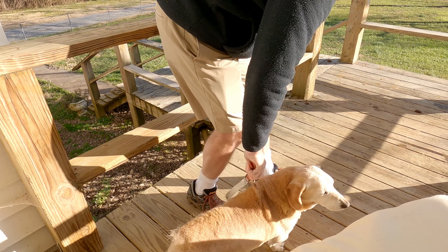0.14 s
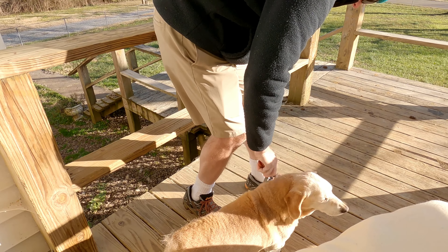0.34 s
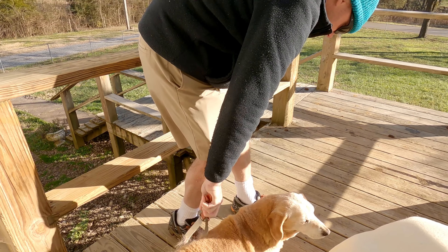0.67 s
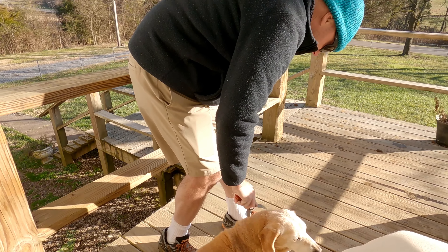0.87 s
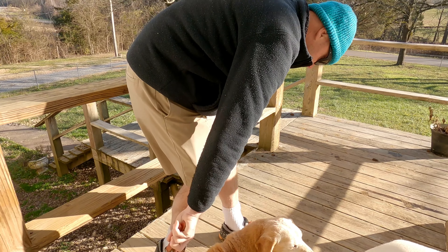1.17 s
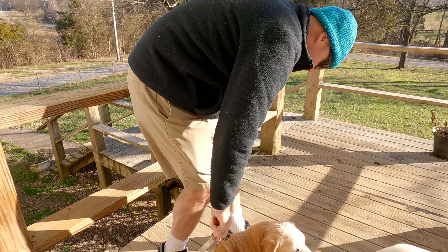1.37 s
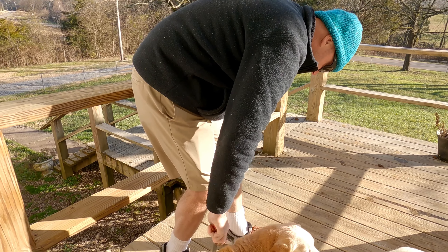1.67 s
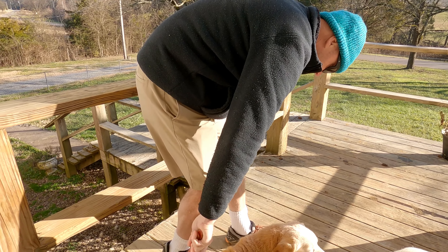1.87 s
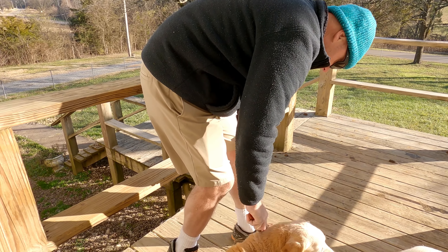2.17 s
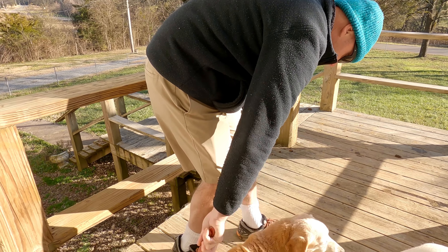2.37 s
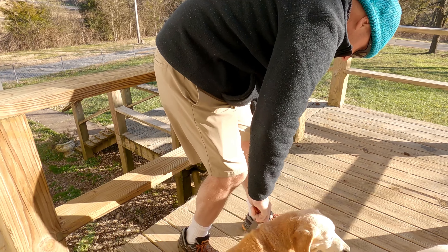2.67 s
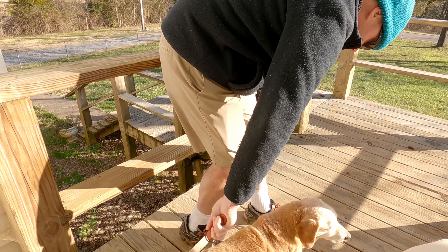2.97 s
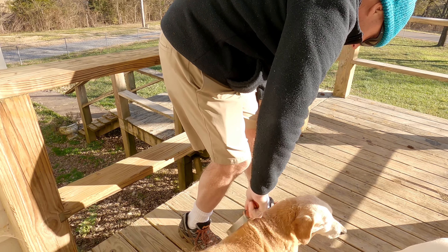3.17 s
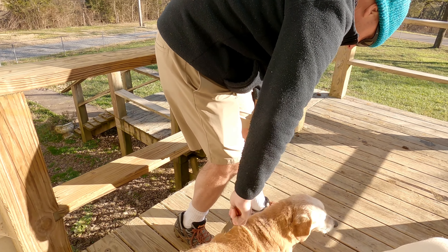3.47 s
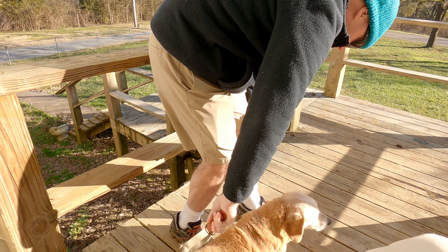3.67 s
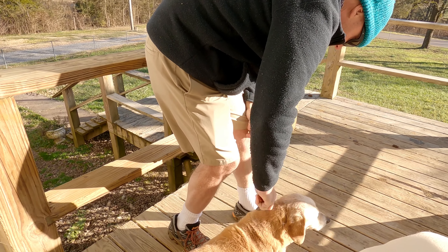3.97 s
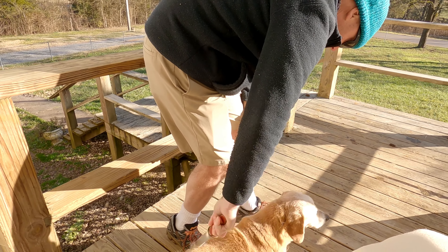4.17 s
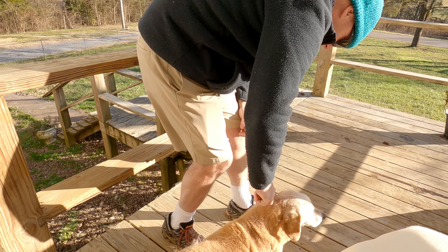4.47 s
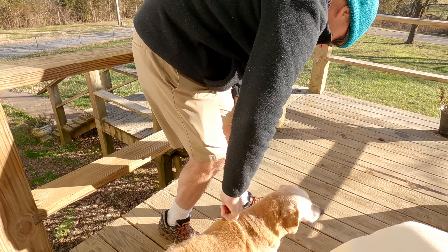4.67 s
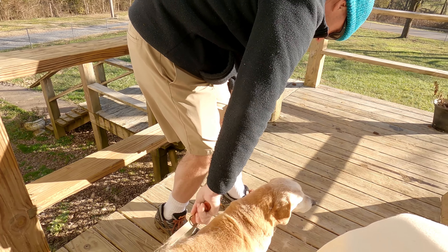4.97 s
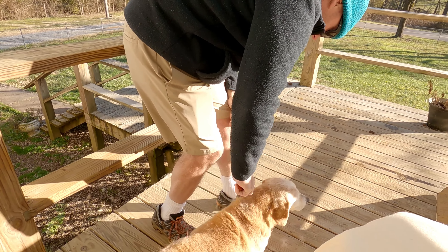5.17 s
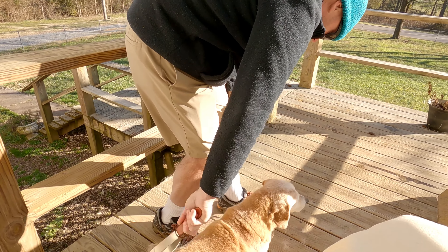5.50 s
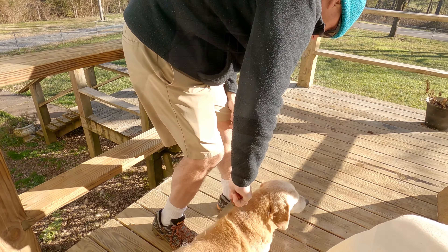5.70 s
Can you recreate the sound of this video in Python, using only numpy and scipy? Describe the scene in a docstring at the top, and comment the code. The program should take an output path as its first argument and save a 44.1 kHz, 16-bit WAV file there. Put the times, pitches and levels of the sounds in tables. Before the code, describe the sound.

Close up, a metal-toothed brush rubs to and fro through a dog's fur, about three strokes a second, with fine scraping and thin high ringing. Odd tangles rasp free. A falling bird whistle comes early, then faint trills and coos. A far motor rises in the first second; an engine drone swells around two seconds. Low rumble and distant traffic lie beneath. Open-air stereo, microphone near the brush.

```python
"""Fine scratching comes first, to and fro: a metal-toothed brush is pulled through a dog's coat outdoors.
Random slips of hair, coloured as rub and scrape, also pluck resonances for the teeth, which ring high
and thin, with single teeth singing out around stroke ends; filtered noise rasps as tangles give way.
Wavering tones make a falling whistle, trills and coos, the drone of a far engine and a motor speeding up.
Coloured noise lies beneath: a low rumble that heaves briefly, far traffic and a faint hiss of air."""
import sys
import numpy as np
from scipy import signal
from scipy.fft import rfft, irfft
from scipy.io import wavfile
from scipy.ndimage import uniform_filter1d

SR = 44100
rng = np.random.default_rng(int(sys.argv[2]) if len(sys.argv) > 2 else 0)


def store_pcm(level_fs):
    """Save levels as 16-bit WAV."""
    pcm = np.round(np.clip(level_fs, -1, 1) * 32767).astype(np.int16)
    wavfile.write(sys.argv[1], SR, np.atleast_2d(pcm).T)


N = 257544
TIME = np.arange(N) / SR
FREQS = np.fft.rfftfreq(N, 1 / SR)

BITE_DB, COAT_BITE_DB = 16.5, 11  # climb over a rise and fall over a lift, for teeth and coat
COAT_LAG_S = 0.0044  # the coat gives way a little after the teeth
TEETH_REST_DB = -79  # pre-mix floor: the teeth never quite leave the fur
# faint rustle between strokes: [t/s, level/dB before the mix]
RUSTLE = [(0, -73.5), (1.8, -86), (2.1, -69.5), (2.5, -66), (2.8, -71.5), (3.1, -72), (3.35, -77),
          (3.7, -79), (4, -68.5), (4.5, -78.5), (5.1, -73.5), (5.6, -76), (5.84, -72)]


def brush():
    """Coat rub, metal scrape and ringing teeth share the uneven drag of the hand."""
    bright_db = brightness()
    catching = gain_of(0.46 * np.clip(wander(24), -1.5, 1.5))
    tooth_strokes = stroking(BITE_DB, ring_share=0.94) * catching
    pull = np.hypot(tooth_strokes, gain_of(TEETH_REST_DB))
    coat_strokes = stroking(COAT_BITE_DB, ring_share=0, lag_s=COAT_LAG_S)
    rub = np.hypot(coat_strokes, gain_of(follow(RUSTLE)[0]))
    drag = gain_of(1.37 * np.clip(wander(45), -1.5, 1.5))

    coat = (coat_hair() + back()) * rub * drag
    hiss = gain_of(-7.5) * scrape(bright_db) * pull * drag
    metal = hiss + gain_of(-8.5) * teeth(pull, bright_db) + pings()
    return gain_of([[4.2], [3.3]]) * coat + gain_of([[1.7], [-1.7]]) * metal + snags()


EDGE_CURVE = 1.28  # exponent that rounds both the bite and the lift
# brush strokes, a light return and a firm pull in turn, levels before the mix:
# [bite t/s, rise/s, hold/s, lift/s, tooth ring level/dB, coat rub level/dB,
#  brightness (scales the treble tilt), swell over the hold/dB]
STROKES = [(0.093, 0.043, 0.12, 0.064, -61.5, -66.5, -0.5, 2),
           (0.457, 0.082, 0.078, 0.079, -60, -64, 1.5, 4), (0.726, 0.041, 0.1, 0.059, -62, -65.5, 3, 0),
           (1.047, 0.089, 0.11, 0.07, -61, -65.5, 1.5, 2), (1.313, .03, .155, 0.083, -64, -67.5, 0, 3.5),
           (1.7, 0.08, 0.085, 0.066, -56.5, -63.5, 0, 4.5),
           (1.948, 0.039, 0.12, 0.064, -65.5, -69, -0.5, 4.5),
           (2.279, 0.084, 0.11, .1, -57.5, -62.5, -1.5, 5.5),
           (2.586, 0.052, .11, 0.096, -60, -64.5, -0.5, -2.5), (2.885, 0.032, .11, .055, -54, -62, 1, 2.5),
           (3.137, .03, 0.14, 0.038, -63, -69.5, 0, 4), (3.457, 0.061, 0.17, 0.032, -57, -64, 0.5, 6),
           (3.806, 0.061, .05, 0.059, -68.5, -70.5, -2, -1), (4.097, 0.095, .095, 0.08, -58.5, -63.5, 0, 4),
           (4.364, .04, 0.064, 0.08, -62.5, -69, -1, -2), (4.664, .09, 0.19, 0.063, -55, -62, -3, 9),
           (5.03, 0.085, 0.11, 0.069, -63.5, -72, -2, 5.5), (5.331, 0.044, 0.15, 0.06, -54.5, -62, -1, 2.5),
           (5.665, .05, .12, 0.049, -62.5, -68, -1, 5.5)]


def stroking(bite_db, ring_share, lag_s=0):
    """Amplitude of all strokes: each bites, swells or eases over its hold, and dies as the brush lifts."""
    power = np.zeros(N)
    for s, rise, hold, lift, ring_db, rub_db, _, swell_db in STROKES:
        near = abs(TIME - s - hold / 2) < .5
        age = TIME[near] - s - lag_s
        before, after = -age / rise, (age - hold) / lift
        off = np.maximum(np.maximum(before, after), 0)  # 0 while the stroke holds
        level_db = ring_share * ring_db + (1 - ring_share) * rub_db
        held_db = swell_db * (np.clip(age / hold, 0, 1) - .5)
        power[near] += gain_of(level_db + held_db - bite_db * off ** EDGE_CURVE) ** 2
    return np.sqrt(power)


PULL_BRIGHTEN, RETURN_BRIGHTEN = 6, -5  # change of brightness over a hold


def brightness():
    """Pulls gather treble as they go; returns land bright and grow duller."""
    ends = []
    for k, (s, _, hold, *_, bright, _) in enumerate(STROKES):
        change = PULL_BRIGHTEN if k % 2 else RETURN_BRIGHTEN
        ends += [(s + u * hold, bright + change * (u - .5)) for u in (0, 1)]
    return follow(ends)[0]


# hair sliding on hair: [f/Hz, relative level/dB per Hz]
COAT = [(300, -2), (600, -2), (1000, -0.5), (1600, 0.5), (2300, 1.5), (3200, 1), (4600, 2), (6500, -0.5),
        (10000, -5), (15500, -21)]


def coat_hair():
    """Hair slipping on hair: dense random impulses given the colour of the coat."""
    return colour(slips(per_s=14000, spread_db=0), COAT)


# modes of the brush's back: [f/Hz, width/Hz, relative level/dB]
BACK = [(2296, 170, -13.5), (3210, 130, -22)]


def back():
    """The dragging coat sets the back of the brush ringing faintly."""
    hairs = slips(per_s=3000, spread_db=1.5)
    return sum(gain_of(db) * evened(resonate(hairs, hz, width)) for hz, width, db in BACK)


# hair sliding on metal: [f/Hz, relative level/dB per Hz]
SCRAPE = [(2000, -21), (5000, -23), (6600, -10), (8000, 5), (9800, -1), (11500, -1), (13500, 3),
          (15500, -7)]


def scrape(bright_db, patchy_db=2.5, brighten=0.38):
    """Hair on metal: a hiss whose colour shifts as different tufts pass the teeth."""
    hiss = rfft(colour(slips(per_s=7000, spread_db=3.0), SCRAPE))
    spacing_hz = 2000
    out = np.zeros((2, N))
    for hz in np.arange(2000, 18000, spacing_hz):
        band = np.maximum(1 - abs(FREQS - hz) / spacing_hz, 0)  # overlapping triangles
        tilt_db = brighten * bright_db * np.clip((hz - 9500) / 1000, -2, 3)
        out += irfft(hiss * band, N) * gain_of(tilt_db + patchy_db * wander(35))
    return out


# modes of a tooth: [f/Hz, relative level/dB]
TEETH = [(6150, -7.5), (7030, -3), (7870, -0.5), (8520, -1.5), (9270, 0.5), (9950, -1), (10900, -1),
         (11800, -4), (12680, -8), (13500, -29), (14500, -19)]


def teeth(pull, bright_db, width_hz=75, detune=0.014, patchy_db=6, brighten=0.34, shared=0.073, count=3):
    """Unequal teeth catch and sing in short spurts; a brighter stroke brings out their upper modes."""
    out = np.zeros((2, N))
    for hz, db in TEETH:
        friction = slips(per_s=2500, spread_db=-0.5)
        tilt_db = brighten * bright_db * (hz - 9500) / 1000
        both_ears = evened(friction + shared * friction[::-1])  # a little of the opposite ear
        drive = both_ears * pull * gain_of(db + tilt_db)
        for place in np.linspace(-1, 1, count):
            spurts = evened(gain_of(patchy_db * np.minimum(wander(30), 1.2)))
            tooth_hz = hz * (1 + detune * (place + rng.uniform(-0.44, 0.47)))
            out += resonate(drive * spurts, tooth_hz, width_hz)
    return out * np.sqrt(SR / (np.pi * width_hz * count))  # makes up for the narrow bands


# single teeth that sing out as they slip free: [t/s, level/dB before the mix, f/Hz]
PINGS = [(0.786, -64, 7200), (1.44, -63, 8650), (2.245, -59.5, 7740), (2.29, -61, 6900), (2.585, -62, 7230),
         (2.879, -56, 8250), (3.24, -59, 7900), (3.275, -62, 7100), (3.435, -64, 7020), (3.81, -64, 7100),
         (4.035, -65, 6130), (4.07, -56, 7870), (4.41, -59, 8000), (4.844, -51.5, 9700), (5.32, -59, 7940)]


def pings(rise=0.012, waver=0.0054):
    """A freed tooth swells for a moment, then the fur damps it."""
    out = np.zeros((2, N))
    unsteady = 1 + waver * wander(210)
    for s, db, hz in PINGS + faint_pings():
        span = (TIME >= s) & (TIME < s + 10 * rise)
        age = (TIME[span] - s) / rise
        turns = np.cumsum(hz * unsteady[span]) / SR + rng.uniform(0, 0.63, (2, 1))
        out[:, span] += np.sqrt(2) * gain_of(db) * age * np.exp(1 - age) * np.sin(2 * np.pi * turns)
    return out


FAINT_PING_DB, PING_SCATTER_S = -68, .022  # level before the mix, and spread around a stroke's ends


def faint_pings(count=3):
    """One of the lowest tooth modes sings faintly near each bite and lift: [t/s, level/dB, f/Hz]."""
    ends = [s + u * hold for s, _, hold, *_ in STROKES for u in (0, 1)]
    rows = []
    for k, (s, (when, which)) in enumerate(zip(ends, rng.random((len(ends), 2)))):
        early = PING_SCATTER_S * (k % 2 == 0)  # bites ping ahead of the hold
        hz = TEETH[int(np.sqrt(which) * count)][0]  # favours the higher of these modes
        rows.append((s + PING_SCATTER_S * (2 * when - 1) - early, FAINT_PING_DB, hz))
    return rows


# tangles that give way: [t/s, level/dB, centre f/Hz, length/s (peaks a third of the way in)]
SNAGS = [(1.078, -62.5, 4300, .017), (1.126, -61.5, 2320, 0.03), (1.708, -55, 8800, .014),
         (2.727, -56, 2300, 0.01), (2.728, -60, 1150, .008), (2.944, -66, 2550, .04),
         (3.61, -59, 12500, 0.018), (4.15, -53, 9600, .017), (4.854, -52.5, 9050, 0.021),
         (5.327, -54, 8250, .012)]


def snags():
    """Short rasps as tangles give way: noise through two equal resonances, swelling and dying."""
    out = np.zeros((2, N))
    for s, db, hz, length in SNAGS:
        age = np.maximum(TIME - s, 0) / (length / 3)
        rasp = resonate(rng.standard_normal(N), hz, width_hz=0.32 * hz)
        rasp = evened(resonate(rasp, hz, width_hz=0.32 * hz))
        out += gain_of(db) * rasp * age * np.exp(1 - age)
    return out


# a bird's falling whistle: [t/s, f/Hz, level/dB before the mix]
WHISTLE = [(.638, 7150, -76), (.657, 6640, -60.5), (.684, 6050, -58), (.692, 5320, -66), (.702, 3930, -68)]
# buzzy chips and trills farther off: [start t/s, length/s, first f/Hz, last f/Hz, level/dB before the mix]
TRILLS = [(1.542, 0.053, 6600, 6250, -68), (1.837, .06, 6700, 6300, -67.5), (1.97, 0.15, 5020, 5180, -71),
          (2.06, 0.17, 5330, 5290, -67), (2.446, 0.27, 4700, 4550, -72), (3.817, .25, 5400, 5650, -72),
          (5.04, .32, 2400, 2420, -78)]
# soft far bird notes, the low ones like a dove's coo: [start t/s, length/s, f/Hz, level/dB before the mix]
COOS = [(1.155, 0.062, 1365, -75.5), (1.773, .09, 1368, -69), (2.03, .26, 516, -71.5),
        (2.85, .22, 506.6, -71), (3.85, 0.21, 506, -69)]


def birds():
    """A falling whistle to the right, rough trills and soft notes from the trees, as wavering tones."""
    whistle = tone(WHISTLE, waver=0.017, waver_hz=494)
    trills = sum(tone(note(*row), waver=.05, waver_hz=450) for row in TRILLS)
    coos = sum(tone(note(s, length, hz, hz, db), waver=0.00504, waver_hz=22.1)
               for s, length, hz, db in COOS)
    near = gain_of([[-2.5], [.5]]) * yard(whistle, t60=0.18, wet=0.4)
    far = gain_of(1.0) * yard(trills + coos, t60=0.27, wet=0.43)
    return near + far


NOTE_ARCH = 0.89  # how sharply a bird's note swells and fades


def note(s, length, first_hz, last_hz, db, count=9):
    """A bird's note glides evenly while its level follows one arch: [t/s, f/Hz, level/dB]."""
    u = np.linspace(0, 1, count)
    arch_db = NOTE_ARCH * 20 * np.log10(.1 + .9 * np.sin(np.pi * u))
    return np.transpose([s + u * length, first_hz + u * (last_hz - first_hz), db + arch_db])


# far engine: [t/s, firing rate f/Hz, level/dB before the mix]
ENGINE = [(0, 158, -65), (1.76, 157, -60.5), (1.85, 157.3, -52), (2.15, 157.6, -42.5), (2.5, 154.5, -48),
          (2.88, 152, -52.5), (3.05, 146, -59), (3.6, 143, -59), (4.34, 156, -53.5), (4.8, 153, -57),
          (5.09, 154.7, -52.5), (5.58, 154.5, -54), (5.72, 153, -67)]
# its orders: [multiple of the firing rate, relative level/dB]
ORDERS = [(1, 0), (2, -16.5), (2.28, -19.5)]
# a far motor speeding up: [t/s, f/Hz, level/dB before the mix]
MOTOR = [(.15, 255, -72), (.32, 275, -61.5), (.55, 305, -66), (.75, 333, -60.5), (1.1, 383, -61.5),
         (1.25, 380, -70)]


def engines():
    """Far engines as tones at their firing orders, made a little unsteady by the air."""
    engine = tone(ENGINE, waver=0.0022, waver_hz=8, orders=ORDERS)
    motor = gain_of(-0.5) * tone(MOTOR, waver=0.0095, waver_hz=17)
    unsteady = gain_of(-1.5 + 0.5 * wander(7.4))
    return yard((engine + motor) * unsteady, t60=.3, wet=0.0057)


RUMBLE_DB, HEAVE_S, AIR_DB = -37, 0.043, -68.5  # steady rumble, spread (sigma) of a swell, air; pre-mix
# colour of the rumble: [f/Hz, relative level/dB per Hz]
RUMBLE = [(10, -14), (22, 1.5), (32, -5), (39, 0), (50, -3.5), (63, -11.5), (80, -14), (100, -26),
          (125, -28.5), (200, -36), (400, -69)]
# brief swells of the rumble: [t/s, level/dB before the mix]
HEAVES = [(.24, -35), (1.22, -34), (1.78, -35.5), (2.92, -33), (3.52, -33), (3.8, -32.5), (4.15, -38),
          (4.5, -35), (4.84, -30.5), (5.17, -36.5), (5.43, -37)]
# colour of the far traffic: [f/Hz, relative level/dB per Hz]
TRAFFIC = [(70, -29.5), (140, 7), (190, 0), (250, 0.5), (325, 0), (400, -6.5), (480, -11.5), (630, -13.5),
           (850, -15.5), (1300, -22.5), (2500, -39), (6000, -59)]
# its course: [t/s, level/dB before the mix]
TRAFFIC_LEVEL = [(0, -58), (.7, -59.5), (1.8, -59), (2.2, -55.5), (3.2, -60), (4.2, -59.5), (4.8, -57.5),
                 (5.3, -59.5), (5.84, -59)]
# still air in the yard: [f/Hz, relative level/dB per Hz]
AIR = [(100, 6.5), (1000, -3), (2000, -1.5), (3500, -6.5), (5300, -4.5), (8000, -8), (12000, -16),
       (15500, -10.5)]


def outdoors():
    """Coloured noise: a low rumble that heaves now and then, far traffic and a faint hiss of air."""
    heaves = sum(gain_of(db) * np.exp(-.5 * ((TIME - s) / HEAVE_S) ** 2) for s, db in HEAVES)
    rumble = colour(rng.standard_normal((2, N)), RUMBLE) * np.hypot(gain_of(RUMBLE_DB), heaves)
    traffic = colour(rng.standard_normal((2, N)), TRAFFIC) * gain_of(follow(TRAFFIC_LEVEL)[0])
    air = colour(rng.standard_normal((2, N)), AIR) * gain_of(AIR_DB)
    return rumble + gain_of(4.0) * traffic + air


def yard(x, t60, wet):
    """Direct sound blended with scattered echoes from trees and walls, as decaying noise."""
    t = TIME[:SR // 2]
    tail = rng.standard_normal((2, len(t))) * gain_of(-60 * t / t60)
    echoes = signal.fftconvolve(x[None], tail / np.linalg.norm(tail[0]), axes=1)[:, :N]
    return np.sqrt(1 - wet) * x + np.sqrt(wet) * echoes


def tone(rows, waver, waver_hz, orders=((1, 0),)):
    """A wavering tone along a pitch and level curve, silent outside it."""
    hz, db = follow(rows)
    turns = np.cumsum(hz * (1 + waver * wander(waver_hz))) / SR
    within = (TIME >= rows[0][0]) & (TIME <= rows[-1][0])
    sounding = uniform_filter1d(1. * within, size=200)  # softened ends
    partials = sum(gain_of(db + d) * np.sin(2 * np.pi * k * turns) for k, d in orders)
    return np.sqrt(2) * sounding * partials


def slips(per_s, spread_db):
    """Tiny random impulses of slipping hairs, always unequal; a larger spread_db makes some stand out more."""
    size = gain_of(spread_db * np.minimum(rng.exponential(1, N), 3)) * (rng.random(N) < per_s / SR)
    return evened(size * rng.standard_normal((2, N)))


# likeness of the two ears: [f/Hz, correlation 0-1]
SAME = [(30, .9965), (90, .9965), (140, .978), (250, .985), (350, .97), (500, .83), (1000, .77),
        (2000, .15), (4000, .03), (8000, .18), (15000, .18)]


def colour(x, spectrum):
    """Gives a pair of signals a spectrum and the likeness of the two ears."""
    left, other = rfft(x)
    same = np.clip(read(SAME), 0, 1)
    pair = np.array([left, same * left + np.sqrt(1 - same ** 2) * other])
    return evened(irfft(pair * gain_of(read(spectrum)), N))


def resonate(x, hz, width_hz):
    """A two-pole resonance."""
    return signal.lfilter(*signal.iirpeak(hz, hz / width_hz, fs=SR), x)


def wander(hz):
    """Slow chance of rms one, up to about hz."""
    steps = np.arange(0, TIME[-1] + 1 / hz, 1 / (3 * hz))
    smooth = np.convolve(rng.standard_normal(N // 8), np.hanning(5), "valid")
    return evened(np.interp(TIME, steps, smooth[:len(steps)]))


def read(points):
    """A table over frequency, joined by lines on a log axis."""
    hz, value = np.transpose(points)
    return np.interp(np.log(FREQS + 1), np.log(hz + 1), value)


def follow(rows):
    """The columns of a table over time, one value a sample."""
    s, *columns = np.transpose(rows)
    return [np.interp(TIME, s, c) for c in columns]


def evened(x):
    """Scales to an rms of one."""
    return x / np.sqrt(np.mean(x ** 2) + 1e-20)


def gain_of(db):
    """Decibels to amplitude."""
    return 10 ** (np.asarray(db) / 20)


def scene():
    """The brush close by and the birds, with engines and outdoor noise a little to the left."""
    return brush() + birds() + gain_of([[.22], [-.22]]) * (engines() + outdoors())


def record(dry):
    """The recorder's steep band limit, a low-pass filter."""
    edge = signal.firwin(1023, 15720, window=("kaiser", 10), fs=SR)  # cutoff in Hz
    return signal.oaconvolve(dry, edge[None], "same")


dry = scene()
out = record(dry)
store_pcm(out)
```